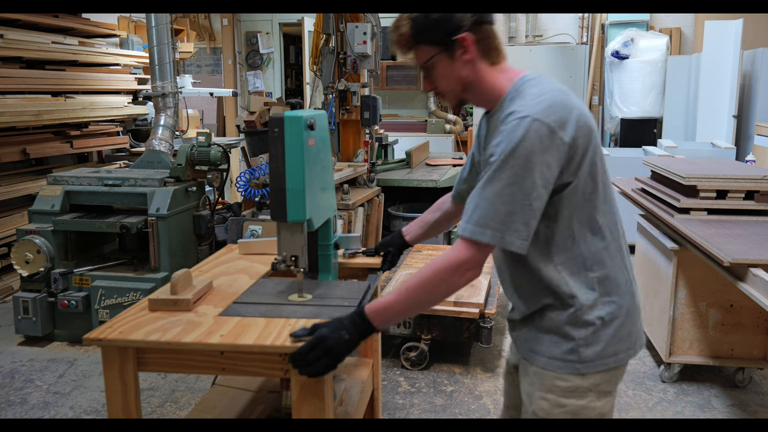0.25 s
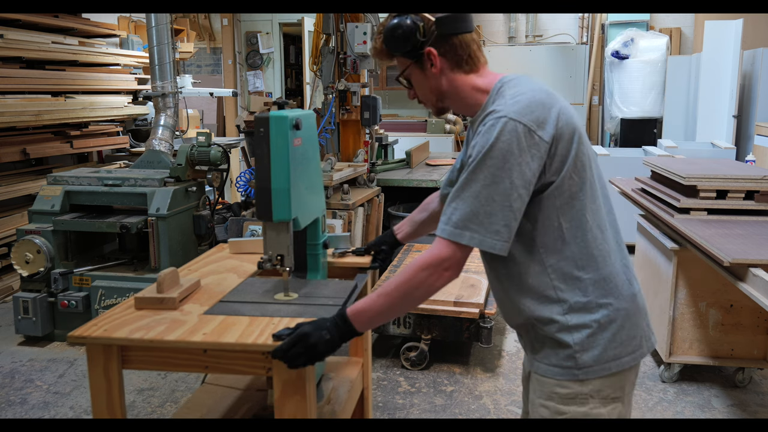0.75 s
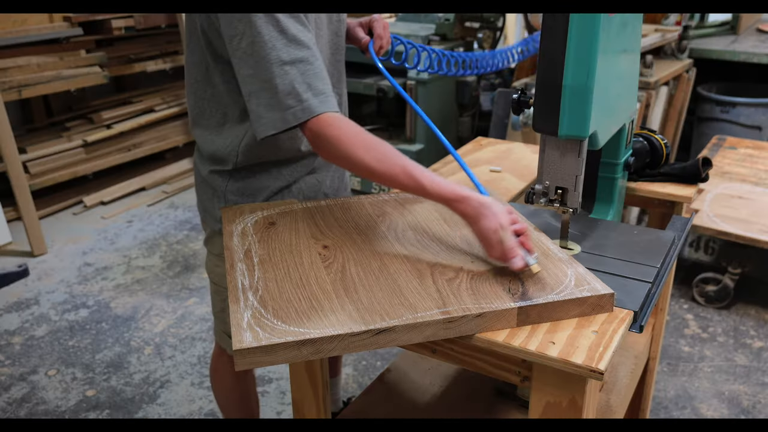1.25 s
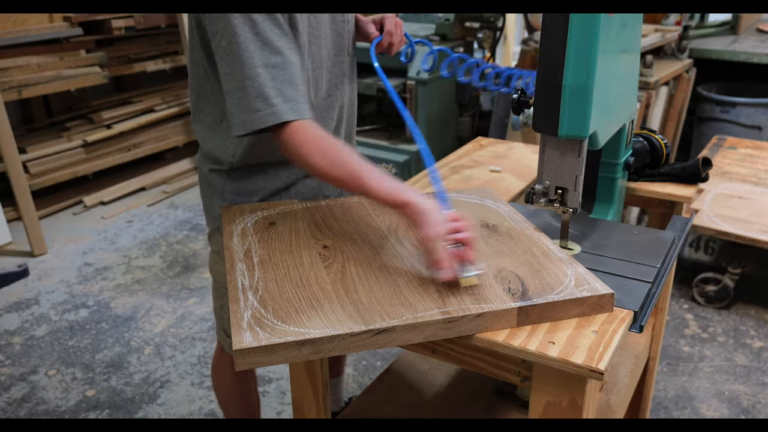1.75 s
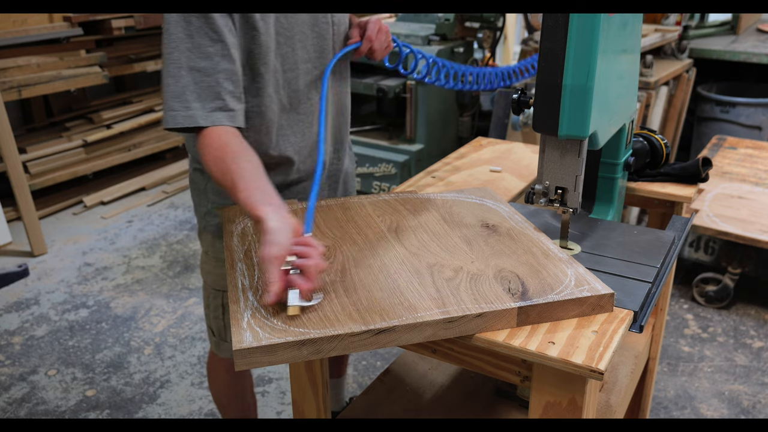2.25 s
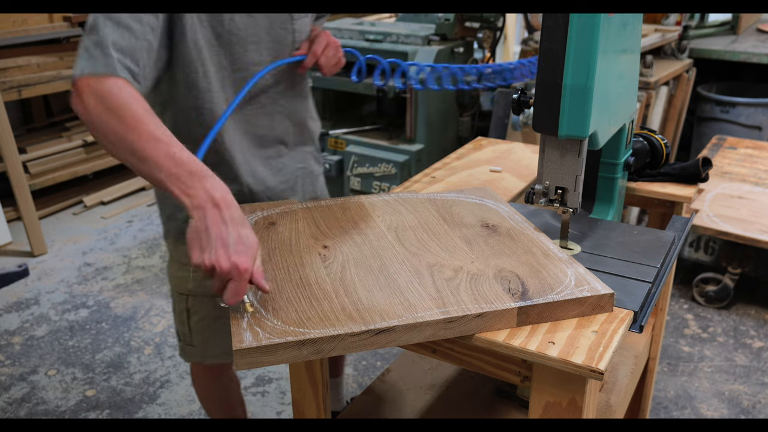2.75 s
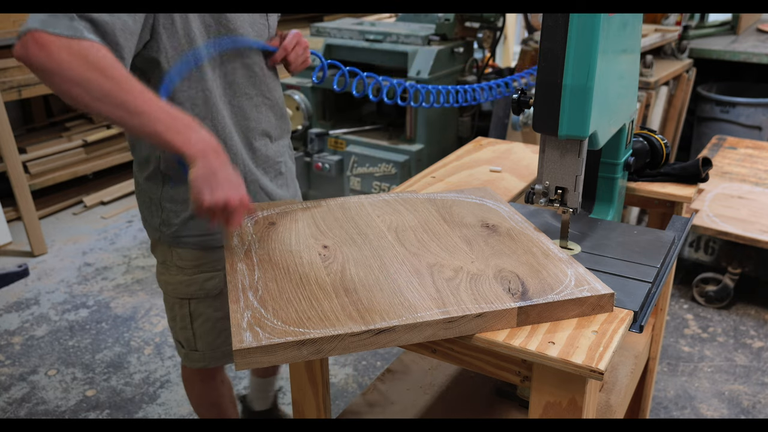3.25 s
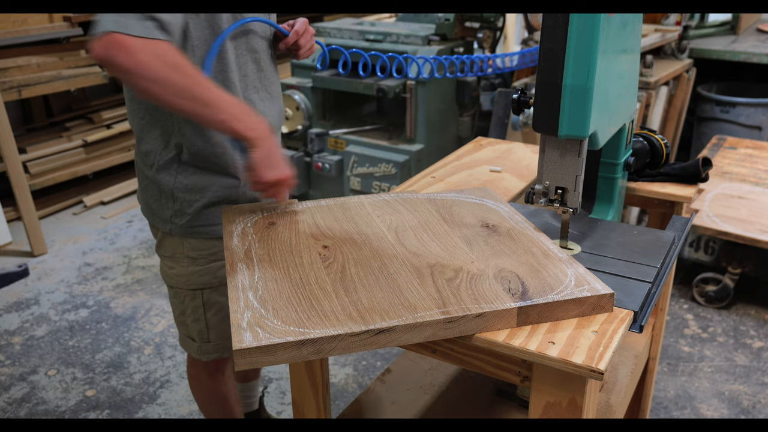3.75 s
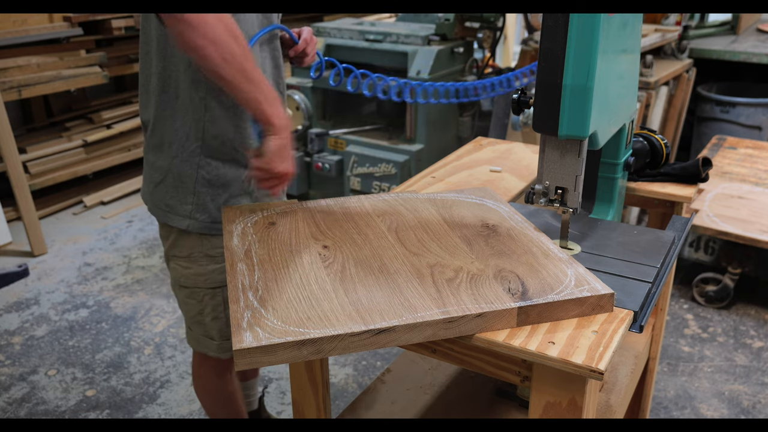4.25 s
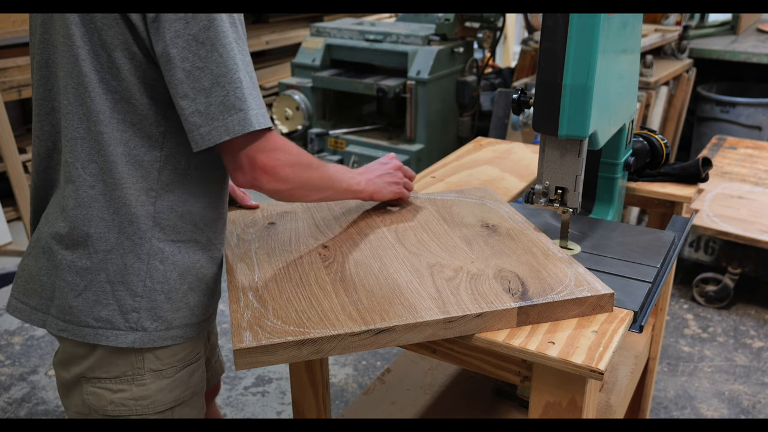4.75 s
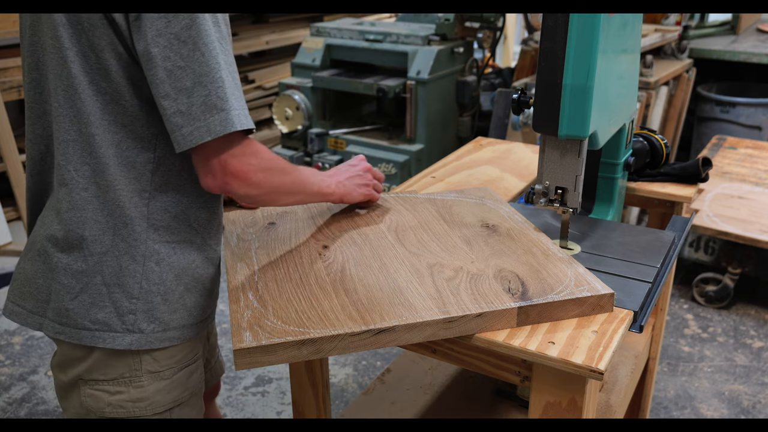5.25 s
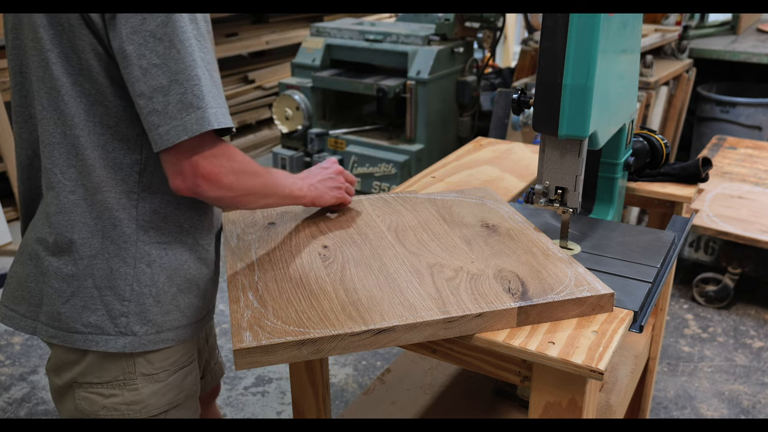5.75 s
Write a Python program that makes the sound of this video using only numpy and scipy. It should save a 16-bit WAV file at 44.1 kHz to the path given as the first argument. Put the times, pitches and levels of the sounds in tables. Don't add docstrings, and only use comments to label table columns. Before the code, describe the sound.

From 0 to 0.87 s, a wooden bench is nudged over concrete in a large workshop: low, muffled rumbles and dry scuffs in short shoves, tiny wood knocks and soft thumps, with a faint high squeak around 0.3-0.45 s. A cluster of knocks comes near 0.47 s, and a sharper, louder crack at 0.75 s leaves a hall tail over faint machine noise. At about 0.88 s a compressed-air blow gun opens abruptly, far louder: dense, bright hiss with whistling glides and a breathy edge tone near 1.7-2 kHz. It is strong and steady until about 2.5 s, dips, surges near 2.9 s, then flicks unevenly with hollow puffs and shifting treble, gradually weakening from about 3.8 s. At 4.66 s it cuts suddenly to a much quieter, steady room hum with a faint air-leak hiss, lasting until the end near 6 s.

```python
import sys
import numpy as np
from scipy import signal
from scipy.fft import rfft, irfft
from scipy.io import wavfile
from scipy.ndimage import uniform_filter1d

SR = 44100
rng = np.random.default_rng(int(sys.argv[2]) if len(sys.argv) > 2 else 0)


def decibels_to_gain(level_db):
    exponent = np.asarray(level_db, float) / 20
    return 10 ** exponent


def store_pcm(level_fs):
    pcm = np.round(np.clip(level_fs, -1, 1) * 32767).astype(np.int16)
    wavfile.write(sys.argv[1], SR, np.atleast_2d(pcm).T)


N = 264114

WINDOW, HOP = 512, 128
HZ = np.maximum(np.fft.rfftfreq(WINDOW, 1 / SR), 1)[:, None]
FRAMES = np.arange(N // HOP + 2) * HOP / SR

# t/s, level/dB, lean to the edge/dB
CONTACT = [(.92, -45.5, -1), (1.3, -41.5, .5), (1.8, -41, -0.6), (2.18, -37, -1.5), (2.4, -37.5, -1),
           (2.63, -47, -0.5), (2.762, -47, -0.5), (2.772, -41, -1.5), (2.85, -42, -0.7), (2.98, -49, 0),
           (3.1, -44.5, 2.5), (3.16, -42, 0.5), (3.42, -48, -0.5), (3.47, -44.5, -1.1), (3.73, -42.5, 0),
           (4.3, -41.5, 0), (4.47, -44.5, -1.2), (4.6, -42, 0.1)]
# t/s, f/Hz
EDGE_PITCH = [(.9, 1650), (1.22, 1690), (1.34, 1840), (1.6, 1870), (1.8, 1850), (1.9, 1700), (2.05, 1760),
              (2.17, 1910), (2.42, 1950), (2.6, 1800), (3.1, 1950)]


def per_frame(rows):
    s, *columns = np.transpose(rows)
    return [np.interp(FRAMES, s, column) for column in columns]


def at_hz(points, hz):
    f, level_db = np.array(points).T[:2]
    return np.interp(np.log(hz), np.log(f), level_db)


def share(power):
    return power / power.sum(axis=0)


def hump(centre_hz, width_hz, steep):
    return share(1 / (1 + np.abs(2 * (HZ - centre_hz) / width_hz) ** steep))


def gesture(start, end):
    soft_ends = 0.29
    nearest_end = np.minimum(FRAMES - start, end - FRAMES)
    return np.clip(nearest_end / (soft_ends * (end - start)), 0, 1)


def glide(start, end, from_hz, to_hz):
    return np.interp(FRAMES, [start, end], [from_hz, to_hz])


def coloured(spectrum, size=N):
    hz = np.maximum(np.fft.rfftfreq(size, 1 / SR), 1)
    x = irfft(rfft(rng.standard_normal(size)) * decibels_to_gain(at_hz(spectrum, hz)), size)
    return x / x.std()


def turbulence(power):
    spec = signal.stft(rng.standard_normal(N), nperseg=WINDOW, noverlap=WINDOW - HOP)[2]
    spec = spec * np.sqrt(power * len(HZ))[:, :spec.shape[1]]
    return signal.istft(spec, nperseg=WINDOW, noverlap=WINDOW - HOP)[1][:N]


def high_pass(x, cutoff_hz):
    return signal.sosfilt(signal.butter(4, cutoff_hz, "high", fs=SR, output="sos"), x)


def walls(x, t60, wet_db):
    t = np.arange(SR // 2) / SR
    response = rng.standard_normal(len(t)) * decibels_to_gain(-60 * t / t60) * (t > .004)
    response = decibels_to_gain(wet_db) * response / np.sqrt(np.sum(response ** 2))
    response[0] = 1
    return signal.fftconvolve(x, response / np.sqrt(np.sum(response ** 2)))[:N]


def bench():
    # f/Hz, level/dB per Hz
    rumble_spectrum = [(35, -63), (60, -29), (276, 1), (310, -7), (489, -5), (542, -6.5), (1510, -17.5),
                       (2000, -25), (2600, -65), (4400, -120)]
    # f/Hz, level/dB per Hz
    scuff_spectrum = [(300, -38), (500, -6.5), (1500, -3), (2600, -8), (3800, -14.5), (4300, -18),
                      (12000, -30), (16000, -51)]
    # start t/s, hardest t/s, stop t/s, rumble level/dB, scuff level/dB
    shoves = [
        (0.108, 0.179, .3, -55.5, -54.5),
        (0.274, 0.356, 0.46, -66, -64),
        (0.368, 0.383, 0.45, -54, -66),
        (0.424, .478, .63, -53, -69),
        (0.567, .72, 1, -61, -69),
    ]
    # start t/s, end t/s, f/Hz, level/dB
    squeak = (.277, .455, 11380, -78)
    creep_db, shove_fade_db = -72.5, 12
    t = np.arange(N) / SR
    rumble = scuff = decibels_to_gain(2 * creep_db) * np.clip(t / .12, .3, 1)
    for start, hardest, stop, rumble_db, scuff_db in shoves:
        rise = np.clip((t - start) / (hardest - start), 0, 1) ** 2
        fade = np.clip((t - hardest) / (stop - hardest), 0, 9)
        push = rise * decibels_to_gain(-2 * shove_fade_db * fade)
        rumble = rumble + decibels_to_gain(2 * rumble_db) * push
        scuff = scuff + decibels_to_gain(2 * scuff_db) * push
    drag = np.sqrt(rumble) * coloured(rumble_spectrum) + np.sqrt(scuff) * coloured(scuff_spectrum)
    start, end, hz, level_db = squeak
    on = np.clip(np.minimum(t - start, end - t) / .01, 0, 1)
    return drag + decibels_to_gain(level_db) * on * np.sin(2 * np.pi * hz * t)


def shop_tone():
    # f/Hz, level/dB per Hz
    shop_spectrum = [(18, -66), (30, -82), (114, 3), (378, -4), (503, -10), (1130, -11), (1430, -25),
                     (1910, -14), (2290, -16), (15400, -23)]
    return decibels_to_gain(-66) * coloured(shop_spectrum)


def knocks():
    # t/s, peak level/dB, f/Hz, t60/s, hardness/Hz
    knock_events = [(.054, -49.5, 1900, .005, 3600), (.056, -54, 1150, .01, 2000),
                    (.117, -50.5, 1300, .01, 4000), (.231, -45, 220, .05, 600),
                    (.372, -50, 1100, .012, 2000), (.42, -42.5, 1450, .011, 1800),
                    (.4685, -43, 800, .025, 900), (.474, -43, 520, .05, 800), (.47, -41, 1150, .008, 1500),
                    (.535, -51, 1200, .01, 2000), (.748, -42, 1170, .03, 12000),
                    (.7495, -38, 2900, .01, 6500), (.7518, -34, 2300, .012, 3500),
                    (.7545, -38, 1500, .015, 2500), (.7585, -49, 10800, .004, 14000),
                    (.776, -53, 9500, .004, 12000)]
    dry, t = np.zeros(N), np.arange(4000) / SR
    for s, peak_db, hz, t60, hard_hz in knock_events:
        click = rng.standard_normal(len(t)) * decibels_to_gain(-60 * t / .008)
        crack = signal.lfilter(*signal.butter(2, hard_hz, fs=SR), click)
        ring = np.sin(2 * np.pi * hz * t) * decibels_to_gain(-60 * t / t60)
        dry[round(s * SR):][:len(t)] += decibels_to_gain(peak_db) * (ring + 0.63 * crack)
    return high_pass(dry, 130)


def thumps():
    # t/s, peak level/dB, f/Hz, t60/s
    thump_events = [(.117, -54, 200, .05), (.139, -53.5, 160, .09), (.175, -56, 500, .07),
                    (.18, -56, 850, .04), (.371, -55, 1100, .04), (.378, -54, 480, .08),
                    (.381, -48.5, 270, .08), (.41, -54, 400, .05), (.438, -56, 260, .09),
                    (.458, -54, 370, .08), (.488, -51, 265, .08), (.492, -55, 500, .09),
                    (.497, -57, 760, .08), (.51, -58, 1050, .05), (.517, -52, 275, .09),
                    (.528, -57, 620, .06), (.548, -55, 300, .06), (.58, -54, 230, .09)]
    rise_s = .004
    dry, t = np.zeros(N), np.arange(6000) / SR
    for s, peak_db, hz, t60 in thump_events:
        envelope = decibels_to_gain(peak_db - 60 * t / t60) * (1 - np.exp(-t / rise_s)) * 2
        dry[round(s * SR):][:len(t)] += envelope * np.sin(2 * np.pi * hz * t)
    return dry


def hall():
    # t/s, level/dB
    bang = (.749, -43.5)
    # f/Hz, level/dB per Hz
    hall_spectrum = [(60, -55), (120, -24), (280, -4), (600, -6), (1150, -1), (1700, -1), (2500, -4),
                     (3600, -6), (3900, -15), (6300, -20), (7000, -24), (12000, -27), (15000, -38)]
    # f/Hz, t60/s
    hall_t60 = [(200, 1.2), (1500, .9), (3600, .85), (6000, .65), (12000, .45)]
    start, level_db = bang
    since = np.maximum(FRAMES - start, 0)
    decay = decibels_to_gain(2 * (level_db - 60 * since / at_hz(hall_t60, HZ)))
    tail = turbulence(share(decibels_to_gain(2 * at_hz(hall_spectrum, HZ))) * decay)
    return tail * np.clip((np.arange(N) / SR - start) / .01, 0, 1)


def free_jet():
    # t/s, strength level/dB, brightness/dB
    jet_strength = [(0.92, -39.5, 2.5), (1.21, -40.5, 0), (1.96, -40, 0.1), (1.99, -38, 2),
                    (2.45, -38, 0.6), (2.5, -44, 1.5), (2.69, -44.5, 0.5), (2.89, -39, 1.6),
                    (3.12, -43, 0.3), (3.37, -45, 2.5), (3.38, -43.5, 3.5), (3.48, -46.5, -1.5),
                    (3.8, -42, -1), (4.02, -49.5, -3), (4.15, -45, -3.5), (4.45, -57.5, -1),
                    (4.61, -49.5, -4.5), (4.66, -59, -2)]
    jet_db, bright_db = per_frame(jet_strength)
    body = decibels_to_gain(2 * (jet_db - 5 - bright_db)) * hump(5500, 1520, 4.0)
    shear = decibels_to_gain(2 * (jet_db - 2 + bright_db)) * hump(7980, 3100, 4.2)
    return body + shear


def screech():
    # t/s, level/dB
    facing = [(0.92, -44.5), (0.99, -47), (1.15, -45), (1.81, -46), (2.04, -42.5), (2.63, -45.5),
              (2.71, -49.5), (2.9, -43), (3.11, -48.5), (3.21, -39.5), (3.61, -42.5), (3.72, -65),
              (4.08, -61.5), (4.17, -71), (4.28, -53), (4.48, -46), (4.59, -70), (4.66, -59.5)]
    facing_db, = per_frame(facing)
    screech_share = share(hump(11760, 1560, 3.7) / (1 + (HZ / 12500) ** 40))
    off_board_db = -4 * np.clip((FRAMES - 2.4) / .2, 0, 1)
    top_db = -52 + 0.81 * (facing_db + 43.5) + off_board_db
    return decibels_to_gain(2 * facing_db) * screech_share + decibels_to_gain(2 * top_db) * hump(14200, 3600, 8.7)


def edge_tone():
    # t/s, width/Hz
    edge_width = [(.9, 80), (1.3, 90), (1.5, 160), (1.95, 240), (2.2, 170), (2.6, 200)]
    contact_db, lean_db = per_frame(CONTACT)
    edge_hz, = per_frame(EDGE_PITCH)
    width_hz, = per_frame(edge_width)
    clear = np.clip((2.51 - FRAMES) / 0.23, .12, .62)
    edge = clear * hump(edge_hz, width_hz, 2.6) + (1 - clear) * hump(2270, 1320, 8.4)
    return decibels_to_gain(2 * (contact_db - 5.5 + lean_db)) * edge


def gap_tone():
    contact_db, lean_db = per_frame(CONTACT)
    edge_hz, = per_frame(EDGE_PITCH)
    gap_hz = 3856 + 0.5 * (edge_hz - edge_hz.mean())
    gap = .5 * hump(gap_hz, 720, 3.9) + .5 * hump(3795, 1580, 7.1)
    return decibels_to_gain(2 * (contact_db - 2 - lean_db)) * gap


def wash_and_puffs():
    # f/Hz, level/dB per Hz
    wash_spectrum = [(18, -104), (30, -74), (86, -40), (369, -15.5), (560, -10.5), (1370, -10),
                     (1890, -3.5), (2870, -18), (3500, 8), (4550, -30), (7700, -120)]
    # t/s, level/dB
    wash_level = [(0.9, -61), (0.94, -60), (1.59, -53.5), (1.96, -51), (2.53, -56.5), (2.66, -54),
                  (2.72, -72.5), (4.66, -73.5)]
    # start t/s, end t/s, level/dB, f/Hz
    puff_events = [(2.735, 2.77, -64, 921), (2.793, 2.826, -58.5, 935), (2.873, 2.93, -61.5, 800),
                   (2.92, 3.0, -67, 900), (2.992, 3.08, -59.5, 710), (3.046, 3.189, -53.5, 980),
                   (3.215, 3.265, -65, 800), (3.49, 3.523, -67, 700), (3.838, 3.96, -59, 613),
                   (3.934, 4.22, -56, 820), (4.186, 4.296, -71, 800), (4.33, 4.5, -60.5, 666),
                   (4.487, 4.658, -56, 836)]
    wash_db, = per_frame(wash_level)
    wash = share(decibels_to_gain(2 * at_hz(wash_spectrum, HZ)) / (1 + (HZ / 1500) ** 7.6))
    power = decibels_to_gain(2 * wash_db) * wash
    for start, end, level_db, hz in puff_events:
        puff = 0.45 * hump(hz, 324, 3.6) + 0.16 * wash
        power = power + decibels_to_gain(2 * level_db) * gesture(start, end) ** 2 * puff
    return power


def whistles():
    whistle_glides = [(0.894, 1.165, 7400, 9000, -41.5), (1.063, 1.293, 9300, 11410, -44.5),
                      (1.33, 1.633, 10200, 9800, -48.5), (1.677, 2.04, 9110, 11110, -45.5),
                      (1.95, 3.25, 10100, 10500, -55), (3.277, 3.48, 10200, 9580, -43),
                      (3.6, 3.74, 11900, 11850, -54), (3.72, 4.12, 11800, 11700, -59),
                      (3.767, 3.918, 8800, 9000, -47), (3.931, 4.06, 8600, 8087, -56),
                      (4.08, 4.234, 8900, 7840, -52.5), (4.42, 4.537, 10500, 10100, -53),
                      (4.56, 4.67, 8300, 8000, -57.5)]
    power = 0
    for start, end, from_hz, to_hz, level_db in whistle_glides:
        band = hump(glide(start, end, from_hz, to_hz), 1300, 3.8)
        power = power + decibels_to_gain(2 * level_db) * gesture(start, end) ** 2 * band
    return power


def edge_sings():
    sing_events = [(1.28, 1.46, 1690, 1670, -54), (1.55, 1.75, 1700, 1700, -56),
                   (2.16, 2.56, 2070, 2090, -54), (2.26, 2.46, 1640, 1680, -52),
                   (2.08, 2.4, 2650, 2780, -52), (3.13, 3.19, 1900, 1900, -55),
                   (3.94, 4.12, 1900, 2000, -54), (4.3, 4.47, 2100, 2050, -55),
                   (2.765, 2.84, 1600, 2300, -52), (3.03, 3.135, 1900, 1920, -49.5),
                   (4.2, 4.27, 2000, 2010, -56), (4.54, 4.65, 1740, 2100, -52)]
    power = 0
    for start, end, from_hz, to_hz, level_db in sing_events:
        band = hump(glide(start, end, from_hz, to_hz), 130, 2.6)
        power = power + decibels_to_gain(2 * level_db) * gesture(start, end) ** 2 * band
    return power


def shadows():
    # start t/s, end t/s, start f/Hz, end f/Hz, depth/dB
    weakened_bands = [(.9, 1.15, 1150, 1100, 5), (1, 1.87, 2600, 3100, 2), (2.54, 2.78, 2000, 1630, 9),
                      (2.72, 2.772, 1800, 1800, 5), (2.88, 3.0, 2200, 2000, 2.5), (2, 2.65, 1000, 1100, 3),
                      (1.6, 1.77, 810, 750, 6), (2.62, 2.786, 10200, 10000, 4.5),
                      (2.66, 2.8, 12900, 12000, 2), (2.9, 2.96, 13800, 14000, 4),
                      (2.75, 2.874, 14400, 15000, 10), (3.36, 3.46, 3600, 3700, 4),
                      (2.96, 3.15, 14000, 14500, 8),
                      (3.1, 3.22, 9600, 8600, 5), (3.23, 3.46, 6800, 6800, 6), (3.41, 3.52, 6800, 8800, 9),
                     (3.47, 3.66, 8500, 9700, 9), (3.6, 3.78, 9500, 11700, 8), (3.5, 3.64, 8300, 8300, 3),
                     (3.62, 3.72, 12900, 12700, 5), (2.46, 2.6, 2300, 2300, 3),
                     (3.63, 3.78, 14500, 14500, 4), (.88, 1.04, 1650, 1650, 2.5),
                     (4.4, 4.52, 4300, 4300, 3), (3.66, 4.24, 14000, 13800, 4), (3.93, 4.08, 7600, 7400, 1),
                     (3.8, 4, 10400, 10600, 6), (4, 4.2, 6800, 6200, 1.5), (3.9, 4.08, 3000, 3000, 4),
                     (4.08, 4.32, 3100, 3200, 2), (4.34, 4.46, 5200, 4500, 1), (4.13, 4.3, 5800, 6600, 4),
                     (4.1, 4.3, 10300, 9000, 5), (4.18, 4.52, 13400, 13400, 1),
                     (3.6, 3.7, 12000, 13500, -4), (4.18, 4.36, 2600, 3100, 4), (4.32, 4.47, 2900, 3000, 8),
                     (4.46, 4.5, 3400, 3700, 6), (4.22, 4.3, 2200, 2400, 3), (4.49, 4.545, 1800, 1800, 2),
                     (4.3, 4.4, 5400, 5200, 4), (3.46, 3.62, 3900, 4000, 2), (3.17, 3.36, 4000, 4000, 2.5),
                     (3.38, 3.68, 1450, 1450, 5), (.95, 1.14, 4700, 6100, 2), (4.55, 4.72, 3000, 3600, 8)]
    # start t/s, end t/s, start f/Hz, end f/Hz, gain/dB
    glints = [(1.3, 1.65, 1250, 1249, 8.5), (2.04, 2.3, 3000, 3095, 1), (2.8, 3.12, 2950, 3250, 3),
              (3.04, 3.16, 1360, 1310, 7), (3.62, 3.823, 4300, 4380, 3), (3.9, 3.998, 4400, 4400, 0.5),
              (4.18, 4.368, 4270, 4400, 2.5), (4.5, 4.62, 1400, 1400, 7.5), (1.5, 1.8, 10200, 10100, 2.5),
              (1.83, 1.92, 6600, 6600, 2), (2.4, 2.58, 1700, 1500, 3.5), (3.47, 3.57, 2500, 2500, 4.5),
              (3.62, 3.72, 7500, 7500, 3), (3.82, 3.9, 7400, 7400, 3.5), (4.05, 4.3, 5400, 5400, 2),
              (4.36, 4.43, 7500, 8000, 3), (4.35, 4.46, 4100, 4200, 3), (3.47, 3.62, 10200, 10400, 3),
              (4.42, 4.53, 9800, 9600, 3), (4.1, 4.2, 9300, 9200, 3), (2.77, 2.88, 4100, 4100, 2)]
    width = 0.11
    strengthened = [(*path, -gain_db) for *path, gain_db in glints]
    depth_db = 0
    for start, end, from_hz, to_hz, db in weakened_bands + strengthened:
        hz = glide(start, end, from_hz, to_hz)
        depth_db = depth_db + db * gesture(start, end) * np.exp(-((HZ - hz) / (width * hz)) ** 2)
    return decibels_to_gain(-2 * depth_db)


def valve():
    open_s, rise_db_per_s, lag_s_per_octave = 0.887, 402, 0.0086
    octaves_below_hiss = np.clip(np.log2(8000 / HZ), 0, 4)
    since_open = FRAMES - open_s - lag_s_per_octave * octaves_below_hiss
    return decibels_to_gain(2 * np.minimum(rise_db_per_s * since_open, 0))


def patches(depth_db, frames, bins):
    x = rng.standard_normal((len(HZ), len(FRAMES)))
    for _ in range(2):
        x = uniform_filter1d(x, size=frames, axis=1)
        x = uniform_filter1d(x, size=bins, axis=0)
    return decibels_to_gain(2 * depth_db * x / x.std())


def blow_gun():
    # f/Hz, level/dB per Hz
    far_hum = [(30, -39), (80, -30), (125, -8.5), (200, 0), (300, -2.5), (500, -19), (800, -20.5)]
    power = free_jet() + screech() + edge_tone() + gap_tone()
    power = power + wash_and_puffs() + whistles() + edge_sings()
    power *= shadows() * valve()
    waving = np.clip((FRAMES - 2.5) / 1.3, 0, 1) * np.clip((HZ - 4000) / 3000, 0, 1)
    power *= patches(0.55 + 0.26 * waving, frames=14, bins=8)
    power *= patches(1.0 + 1.93 * waving, frames=5, bins=3)
    jet = walls(turbulence(power), t60=.3, wet_db=-11)
    return high_pass(jet, 330) + decibels_to_gain(-83) * coloured(far_hum)


def side_bursts():
    burst_events = [(1.2948, 6200, 8300, -49), (1.6404, 6900, 9000, -47), (1.942, 5000, 6900, -46),
                    (1.942, 7600, 9600, -47), (2.128, 4100, 5300, -47), (2.175, 5000, 6400, -47),
                    (2.175, 10300, 11800, -49), (2.175, 12400, 15200, -57), (2.94, 5700, 6900, -50),
                    (2.94, 12400, 13800, -58), (4.592, 4700, 5700, -54)]
    size = 2048
    side, window = np.zeros(N), np.sin(np.pi * np.arange(size) / size) ** 2
    hz = np.fft.rfftfreq(size, 1 / SR)
    for s, low, high, level_db in burst_events:
        noise = irfft(rfft(rng.standard_normal(size)) * (hz > low) * (hz < high))
        side[round(s * SR) - size // 2:][:size] += decibels_to_gain(level_db + 1) * window * noise / noise.std()
    return side * [[1], [-1]]


def quiet_shop():
    # f/Hz, level/dB per Hz
    leak_spectrum = [(30, -57), (117, -6.5), (236, -7), (560, -8.5), (800, -13), (2300, -11), (3100, -12),
                     (3350, -18.5), (3800, -17.5), (5900, -16.5), (6200, -12), (9300, -16), (9450, -19.5),
                     (15400, -25.5)]
    # f/Hz, width/Hz, level/dB
    leak_peaks = [(234, 66, -69), (460, 14, -74.5), (1033, 22, -74.5), (1320, 110, -73), (2020, 30, -81),
                  (3730, 170, -73), (6600, 200, -71.5), (7650, 480, -69.5), (8600, 200, -78)]
    hz = np.fft.rfftfreq(N, 1 / SR)
    peaks = 0
    for centre, width, level_db in leak_peaks:
        peaks = peaks + decibels_to_gain(level_db) / np.sqrt(width) / (1 + (2 * (hz - centre) / width) ** 2)
    rings = irfft(rfft(rng.standard_normal(N)) * peaks * np.sqrt(SR / 2), N)
    return decibels_to_gain(-57.5) * walls(coloured(leak_spectrum), t60=0.95, wet_db=10.5) + rings


def scene():
    changes = (0.8697, 0.8735, 4.661)
    t = np.arange(N) / SR
    first, fade_in, second = changes
    nudging = bench() + shop_tone() + knocks() + thumps() + hall()
    nudging = nudging * np.clip((first - t) / .003, 0, 1)
    blowing = blow_gun() * np.clip((t - fade_in) / 0.044, .002, 1) * (t > first)
    blowing = blowing * np.clip((second - t) / .002, 0, 1)
    resting = quiet_shop() * np.clip((t - second) / 0.0049, 0, 1)
    return np.tile(nudging + blowing + resting, (2, 1))


def treble_gaps(x):
    gaps = [
        (3.356, 3.435, 15250, 16500),
        (3.374, 3.414, 14750, 15250),
        (3.378, 3.414, 12950, 14750),
        (3.38, 3.41, 13450, 14050),
        (3.385, 3.44, 13000, 13450),
        (3.41, 3.44, 14200, 14500),
        (3.43, 3.455, 15250, 15550),
    ]
    margin_s = .006
    spec = signal.stft(x, nperseg=WINDOW, noverlap=WINDOW - HOP)[2]
    kept = np.ones((len(HZ), len(FRAMES)))
    for start, end, low, high in gaps:
        during = (FRAMES > start - margin_s) * (FRAMES < end + margin_s)
        kept[during * (HZ > low) * (HZ < high)] = 0
    return signal.istft(spec * kept[:, :spec.shape[1]], nperseg=WINDOW, noverlap=WINDOW - HOP)[1][:N]


def top_cut(x):
    return signal.sosfilt(signal.butter(12, 16010, fs=SR, output="sos"), x)


def record(dry):
    mono = treble_gaps(dry[0])
    hz = np.fft.rfftfreq(N, 1 / SR)
    slot = 1 - .9 * np.exp(-((hz - 15440) / 70) ** 2)
    limit = decibels_to_gain(np.clip((15730 - hz) / 3, -60, 0))
    mix = irfft(rfft(mono) * slot * limit, N) + side_bursts()
    return top_cut(mix)


dry = scene()
out = record(dry)
store_pcm(out)
```